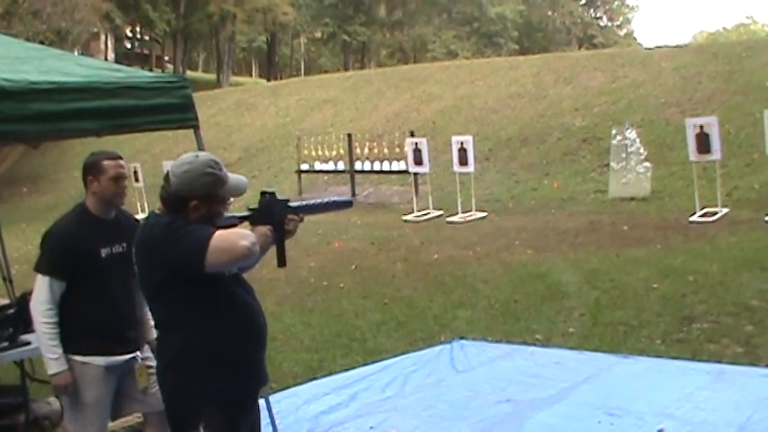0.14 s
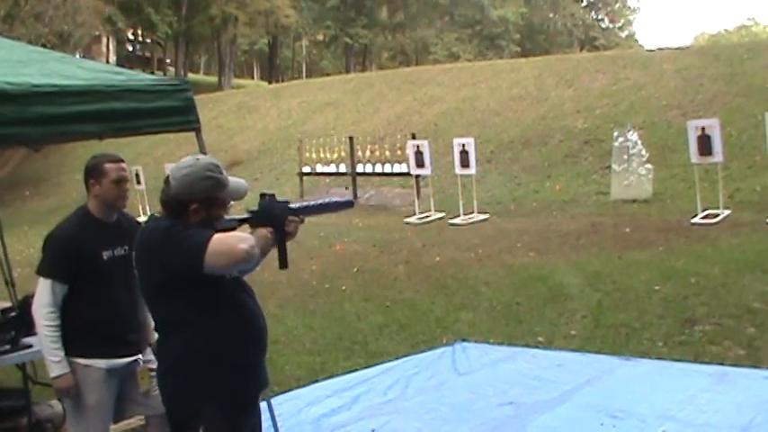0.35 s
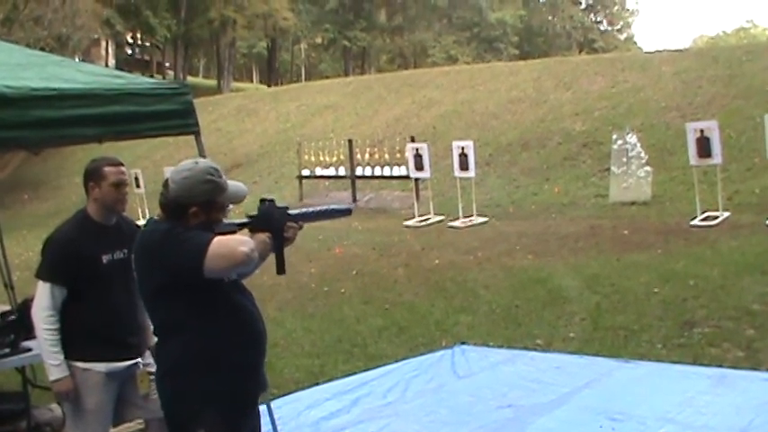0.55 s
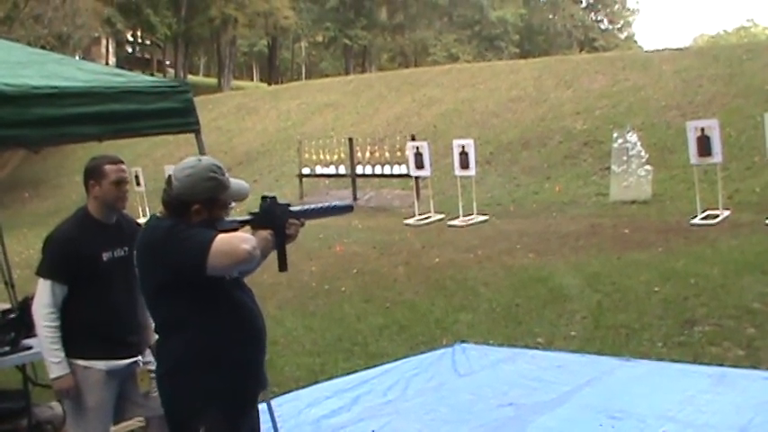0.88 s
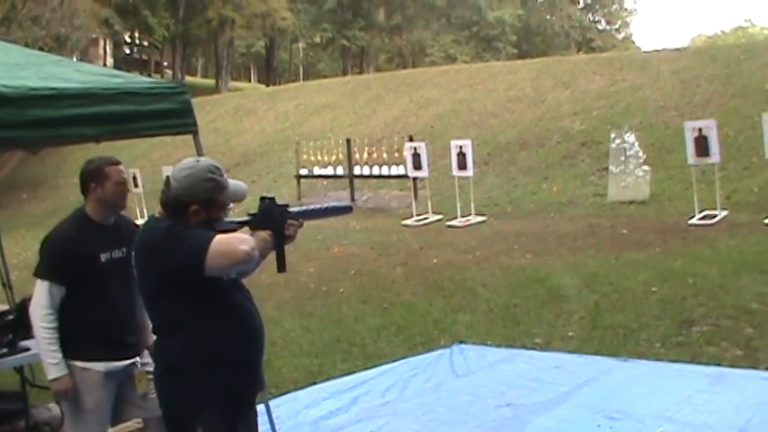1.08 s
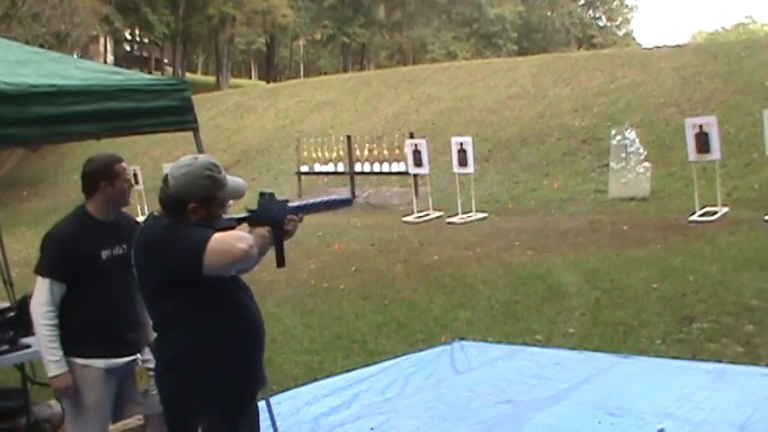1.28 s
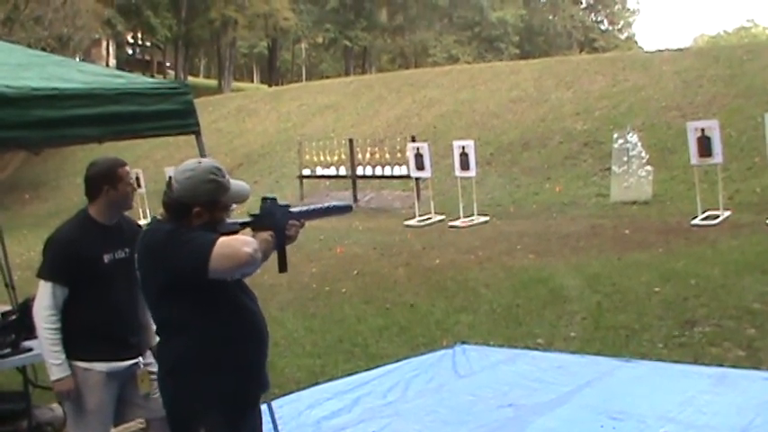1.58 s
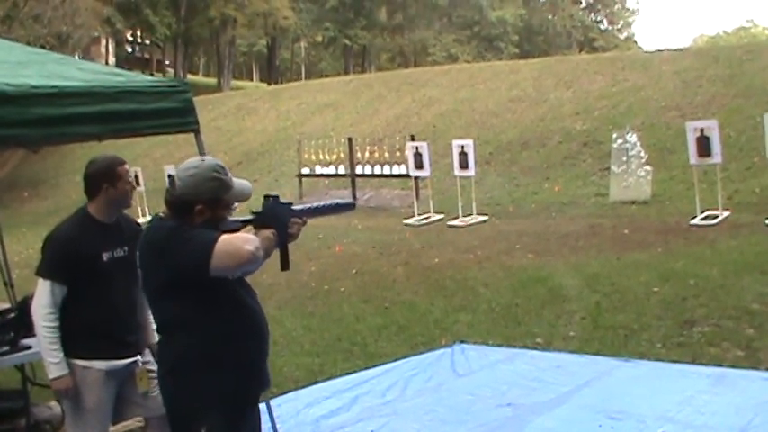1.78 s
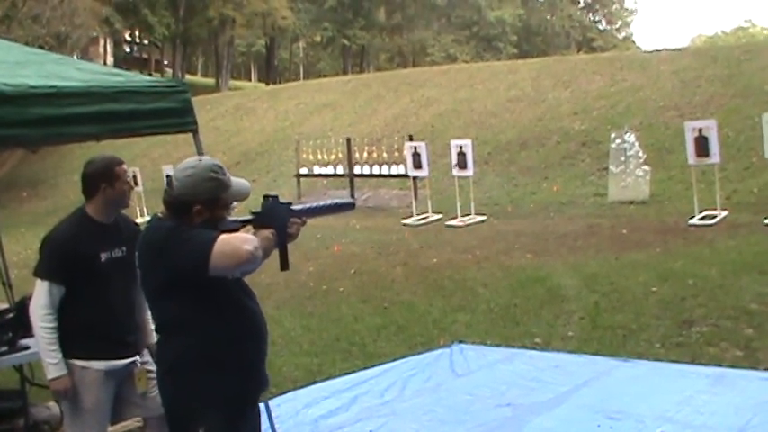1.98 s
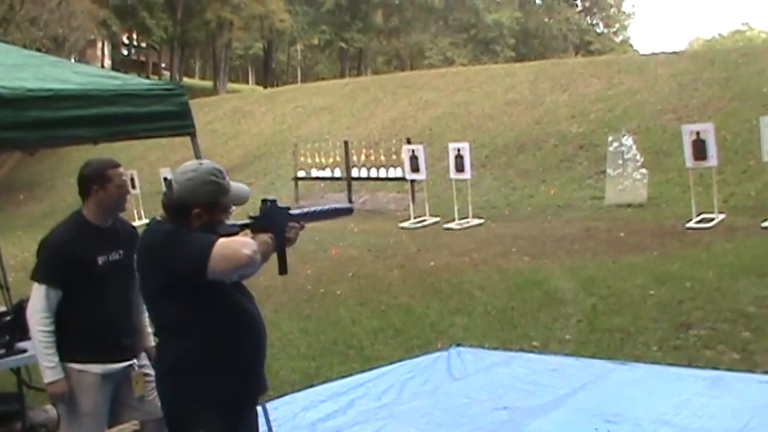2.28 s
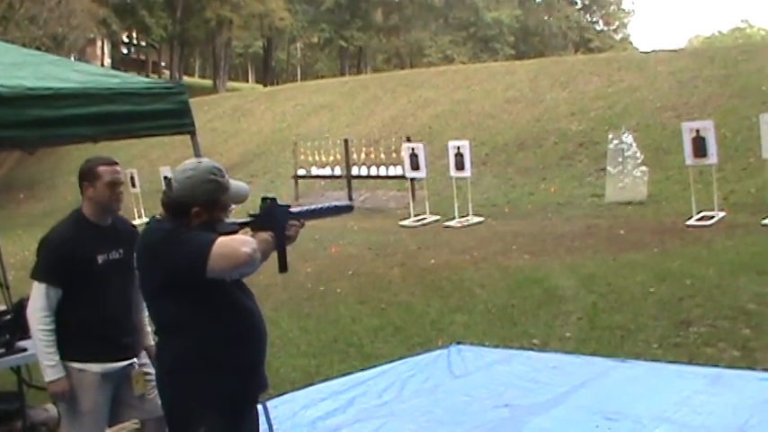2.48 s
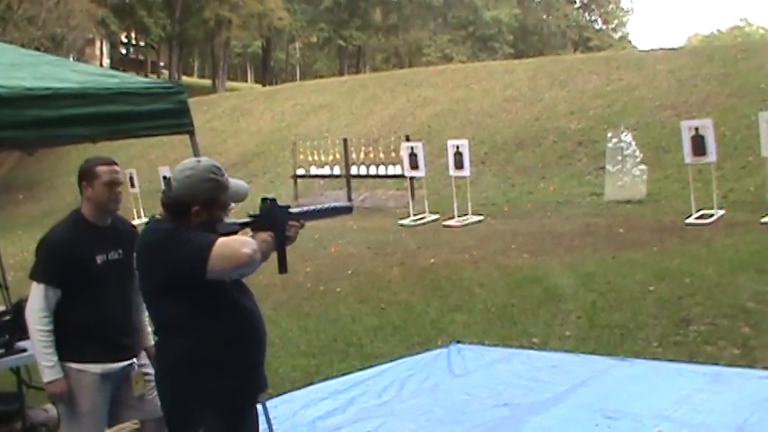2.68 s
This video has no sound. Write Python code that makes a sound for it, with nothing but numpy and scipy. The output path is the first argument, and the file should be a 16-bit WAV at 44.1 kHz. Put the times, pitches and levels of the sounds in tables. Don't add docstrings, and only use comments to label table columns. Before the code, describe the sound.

Close stereo pickup outdoors: rapid muffled gunshots in three bursts, each with a low pop and hard metallic clack, echoes returning from bank and trees, brass pattering on a sheet between; loudness squashed by a limiter.

```python
import sys
import numpy as np
from scipy import signal
from scipy.io import wavfile
from scipy.ndimage import uniform_filter1d, minimum_filter1d

SR = 44100
rng = np.random.default_rng(int(sys.argv[2]) if len(sys.argv) > 2 else 0)


def wrap_up_sound(samples):
    columns = np.atleast_2d(samples).T
    tamed = np.clip(columns, -1, 1)
    steps = np.round(tamed * 32767).astype(np.int16)
    wavfile.write(sys.argv[1], SR, steps)


def elevation(decibels):
    levels = np.asarray(decibels, float)
    return 10 ** (levels / 20)


N = 125685
STEP = 32
EDGES = 40 * 2 ** np.arange(0, 8.8, .25)
KNOCK_T = np.arange(4000) / SR
LEFT_RIGHT = np.array([[1], [-1]])


def at_hz(points, hz):
    known_hz, value = np.transpose(points)
    return np.interp(np.log(hz), np.log(known_hz), value)


def rms_one(x):
    return x / np.sqrt(np.mean(x ** 2) + 1e-20)


def drift(rate_hz):
    r = np.exp(-2 * np.pi * rate_hz * STEP / SR)
    noise = rng.standard_normal(N // STEP + 501)
    return rms_one(signal.lfilter([1], [1, -2 * r, r * r], noise)[500:])


def follow(curve, size):
    t = np.arange(N // size + 1) * size / SR
    return elevation(np.interp(t, *np.transpose(curve), left=-120, right=-120))


def swells(times, level_db, delay, rise, t60):
    t = np.arange(N // STEP + 1) * STEP / SR
    age = np.maximum(t - np.array(times)[:, None] - delay, 0)
    decay = elevation(np.array(level_db)[:, None] - 60 * age / t60)
    return np.sqrt(np.sum((decay * (1 - np.exp(-age / rise))) ** 2, axis=0))


def band_power(spectrum, envelope, patchy_db):
    hz, together = np.sqrt(EDGES[1:] * EDGES[:-1]), drift(24)
    colour = elevation(2 * at_hz(spectrum, hz))
    colour = colour / np.sum(colour * np.diff(EDGES) * 4 / SR)
    bands = []
    for c, f in zip(colour, hz):
        flicker = elevation(patchy_db * (0.87 * together + drift(19.0)))
        bands.append(c * (flicker * envelope(f)) ** 2)
    return np.array(bands)


# (frequency [Hz], likeness [0 to 1])
LIKENESS = [(60, 0.97), (180, 1), (550, 0.89), (1650, 0.84), (2800, 0.88), (4970, 0.8), (9000, 0.9),
            (14000, 0.46)]
# (frequency [Hz], level [dB])
LEAN = [(60, -1), (240, 0.5), (950, 1), (3770, 0.5), (9000, -1), (15000, 0)]


def banded(power):
    out = 0
    white = rng.standard_normal((2, 2, N + SR // 4))
    for k, (low, high) in enumerate(zip(EDGES, EDGES[1:])):
        band = signal.butter(3, [low, high], "band", fs=SR, output="sos")
        mid, side = signal.sosfilt(band, white[k % 2])[:, -N:]
        hz = np.sqrt(low * high)
        alike = np.clip(at_hz(LIKENESS, hz), 0, 1)
        pair = np.sqrt(1 + alike) * mid + np.sqrt(1 - alike) * side * LEFT_RIGHT
        gain = np.interp(np.arange(N) / STEP, np.arange(power.shape[1]), np.sqrt(power[k]))
        out = out + gain * pair * elevation(at_hz(LEAN, hz) / 2 * LEFT_RIGHT)
    return out


def add(out, s, sound, left_db):
    i = int(s * SR)
    if i >= 0:
        out[:, i:i + len(sound.T)] += (sound * elevation(LEFT_RIGHT / 2 * left_db))[:, :N - i]


# (frequency [Hz], level [dB per Hz])
AIR = [(18, -30), (40, -2), (150, -3.5), (300, 0.5), (440, -4.5), (800, 2), (3870, -8.5), (9000, -17),
       (16000, -44)]


def air():
    return band_power(AIR, lambda hz: elevation(-48.5), 0.94)


# (time [s], level [dB])
CRINKLE = [(1.8385, -60), (1.843, -17.5), (1.856, -20.5), (1.882, -22), (1.895, -40), (1.912, -33),
           (1.925, -35), (1.95, -32), (1.98, -34), (2.07, -43)]
# (frequency [Hz], level [dB per Hz])
TARP = [(180, -38), (300, -10), (1060, -11), (2300, -8.5), (3300, -6), (6300, -5), (10500, -16),
        (16000, -22)]


def tarp():
    shape = follow(CRINKLE, size=STEP)
    return band_power(TARP, lambda hz: shape, 1.8)


# (time [s], level [dB])
SLIDE = [(1.8385, -57), (1.844, -20), (1.85, -16.5), (1.858, -22), (1.88, -19), (1.912, -16.5),
         (1.917, -29), (1.95, -24.5), (1.98, -32), (2.025, -36.5), (2.07, -53)]
# (frequency [Hz], width [Hz], level [dB])
BRASS = [(6500, 540, 6), (10500, 690, -7.5), (8140, 4600, 5.5), (13000, 2500, -25), (4000, 1100, -10)]


def brass():
    clicks_per_s, side_db, left_db = 11000, -13, -4
    struck = rng.random((2, N)) < clicks_per_s / SR
    clicks = struck * rng.standard_normal((2, N)) + 1e-18
    ring = 0
    for hz, width, db in BRASS:
        mode = signal.iirpeak(hz, hz / width, fs=SR)
        ring = ring + elevation(db) * rms_one(signal.lfilter(*mode, clicks))
    mid, side = ring
    pair = mid + elevation(side_db) * side * LEFT_RIGHT
    return follow(SLIDE, size=1)[:N] * pair * elevation(LEFT_RIGHT / 2 * left_db - 10.5)


# (time [s], peak level [dB], centre [Hz], t60 [s])
TICKS = [(0.136, -16, 9000, 0.015), (.138, -19, 2470, 0.0067), (.158, -9.5, 4760, 0.048),
         (.313, -5, 7000, 0.029), (.397, -14, 4000, .015), (1.317, -12, 3030, .012),
         (1.3258, -4, 3800, 0.0065), (.145, -11, 4500, 0.083), (1.132, -16, 8800, 0.014),
         (1.134, -23, 15000, 0.027), (1.1675, -5, 4170, 0.022), (2.0292, -13, 9000, .03),
         (2.036, -10, 4570, 0.12), (2.042, -16, 9000, .04), (2.065, -2.5, 4000, 0.045),
         (.161, -10, 8000, .012), (0.171, -14, 4500, 0.0047), (.2415, -10, 7500, 0.0089),
         (.3105, -17, 5000, .006), (.9268, -44, 12500, .02), (1.0011, -57, 12000, .015),
         (1.0201, -56, 12500, .015), (2.143, -6, 1380, 0.01), (1.2932, -8.5, 2270, 0.013),
         (1.162, -2, 4000, 0.01), (1.1499, 0, 7500, .012), (1.154, -5, 6900, .015),
         (1.832, -32, 12000, 0.016), (1.8395, -19, 11000, .006), (1.8385, -32, 5000, .006),
         (1.877, -17, 10500, .02), (1.171, -10, 2180, .012), (1.8408, -22, 2900, 0.0062),
         (1.842, -4.5, 7200, 0.035), (1.8479, -18, 6500, 0.024), (1.844, -11, 2640, 0.056),
         (1.861, -12.5, 2000, 0.027), (1.876, -15, 3000, 0.012), (1.9201, -15, 2460, 0.0072),
         (1.9193, -13, 4600, 0.0083), (1.918, -10, 8000, 0.016), (1.919, -16, 13000, 0.011),
         (2.0525, -18, 4500, .006), (2.059, -12, 3500, 0.0051), (2.5, -34, 12500, .012),
         (2.52, -32, 11500, .02)]


def ticks():
    out, t = np.zeros((2, N)), KNOCK_T
    for s, db, hz, t60 in TICKS:
        noise = rng.standard_normal(len(t))
        band = signal.butter(2, [hz * 0.66, min(hz * 1.22, .45 * SR)], "band", fs=SR, output="sos")
        burst = signal.sosfilt(band, noise * elevation(-60 * t / t60))
        add(out, s, elevation(db) * burst / np.abs(burst).max(), 0)
    return out


# (time [s], peak level [dB], pitch [Hz], t60 [s], side angle [rad]: 0 centre, 1.5 opposite in the two sides)
THUDS = [(0.177, -9, 236, 0.039, .05), (.181, -26.5, 356, 0.021, -0.25), (0.237, -11, 278, 0.011, 1.3),
         (0.253, -18, 330, 0.04, -0.32), (.310, -17, 312, 0.011, 0.75), (0.341, -18, 258, 0.023, -0.4),
         (0.403, -21.5, 400, 0.036, -0.23), (1.148, -20, 300, 0.022, 1), (1.174, -17.5, 330, 0.038, -.2),
         (1.216, -15, 272, 0.012, -0.68), (1.248, -15, 300, 0.018, -.2), (1.321, -15.5, 356, 0.045, -0.2),
         (1.401, -20.5, 183, 0.032, -0.14), (1.84, -25.5, 266, 0.024, -0.06), (1.875, -38, 276, .03, 0),
         (1.949, -21, 253, 0.022, -0.049), (2.069, -22, 330, 0.02, -0.39),
         (2.145, -19.5, 247, 0.023, 0.067), (2.219, -14, 240, 0.015, 0), (1.861, -34.5, 120, 0.045, 0),
         (1.9495, -31, 700, 0.014, 0), (2.142, -18, 383, 0.031, -0.31), (2.212, -20, 367, 0.04, -0.2),
         (2.282, -19, 376, 0.03, -0.24), (2.521, -36, 252, 0.035, 0)]


def thuds():
    out, t, rise_cycles = np.zeros((2, N)), KNOCK_T, 0.54
    for s, db, hz, t60, side in THUDS:
        shape = elevation(-60 * t / t60) * (1 - np.exp(-t * hz / rise_cycles)) ** 2
        tone = np.sin(2 * np.pi * hz * t) + 0.43 * np.sin(2 * np.pi * 1.534 * hz * t)
        placed = tone * (np.cos(side) + np.sin(side) * LEFT_RIGHT)
        add(out, s, elevation(db - 2.0) * shape / shape.max() * placed, 0)
    return out


# (time [s], peak level [dB])
SLAMS = [
    (0.239, -7),
    (0.3124, -1.5),
    (1.1466, 2),
    (1.2183, 3),
    (1.2909, -4),
    (1.3945, -8),
    (1.9187, -6.5),
    (2.06, 1),
    (2.1398, -5),
]


def slams():
    out, length_s = np.zeros((2, N)), .00022
    ramp = 2 * KNOCK_T / length_s - 1
    for s, db in SLAMS:
        add(out, s, elevation(db) * (ramp + 0.35) * (ramp <= 1), 0)
    return out


# (time [s], pop level [dB], crack level [dB], action level [dB])
ROUNDS = [(-.33, -12, -24.5, -20), (0.1359, -7, -11, -21), (0.212, -9.5, -14, -20),
          (0.2859, -9.5, -13, -22), (.3595, -9.5, -15, -26.5), (1.1327, -10, -10.5, -18.5),
          (1.2061, -13.5, -17.5, -22), (1.2796, -14, -14.5, -25), (2.0280, -5.5, -9, -20.5),
          (2.1006, -7.5, -15, -37), (2.1704, -8.5, -14.5, -19), (2.2413, -9, -14, -23)]
# (frequency [Hz], level [dB per Hz])
ACTION = [(290, -40), (500, -19), (750, 4.5), (1640, -8), (1930, 0), (6610, -7.5), (8960, 3.5),
          (16000, -14)]


def action():
    s, _, _, db = np.transpose(ROUNDS)
    shape = swells(s, db, delay=0, rise=0.0022, t60=0.64)
    return band_power(ACTION, lambda hz: shape, 2.5)


# (frequency [Hz], level [dB per Hz])
ECHO = [(35, -41), (60, -15), (300, -16), (500, -16.5), (1000, -15.5), (2000, -6.5), (4400, -1), (8700, -4),
        (16000, -18)]
# (frequency [Hz], t60 [s])
ECHO_T60 = [(100, 0.89), (400, 1.72), (1000, 1.93), (3000, 1.686), (4500, 1.21), (6500, 0.97),
            (10000, 0.75), (12500, 0.56), (15500, 0.45)]


def echoes():
    s, _, db, _ = np.transpose(ROUNDS)

    def tail(hz):
        return swells(s, db, delay=0.02, rise=0.016, t60=at_hz(ECHO_T60, hz))

    return band_power(ECHO, tail, 0.75)


# (frequency [Hz], level [dB], t60 [s])
POP = [(79, -4.5, 0.03), (122, -2, 0.046), (330, -10, 0.028), (424, -14.5, 0.024), (616, -11.5, 0.033),
       (745, -10, 0.024), (980, -15, 0.019), (1142, -14, 0.032), (1470, -9, 0.016)]


def pops():
    out, t = np.zeros((2, N)), KNOCK_T
    rise_s, spread_db, glide_per_s, left_db = .0011, 1.2, 16.6, 1
    lead_rad = 0.14 * LEFT_RIGHT
    for s, db, _, _ in ROUNDS:
        rings = 0
        for hz, mode_db, t60 in POP:
            luck = rng.normal()
            cycles = hz * t * (1 + glide_per_s * t) if hz < 200 else hz * t + luck
            decay = elevation(db + mode_db + spread_db * luck - 60 * t / t60)
            rings = rings + decay * np.sin(2 * np.pi * cycles + 0.52 + lead_rad)
        add(out, s, rings * (1 - np.exp(-t / rise_s)), left_db)
    return out


def scene():
    hiss = banded(air() + tarp() + action() + echoes())
    return hiss + brass() + ticks() + thuds() + slams() + pops()


def low_pass(x):
    return signal.sosfilt(signal.butter(12, 17020, fs=SR, output="sos"), x)


def record(dry):
    limit_db, share, attack_s, release_db_per_s = -18, 0.8, 0.0022, 110
    low_cut_hz, top_cut_hz, look_ahead_s = 74, 16050, .003
    r = np.exp(-1 / (attack_s * SR))
    power = signal.lfilter([1 - r], [1, -r], np.mean(dry ** 2, axis=0))
    over = np.maximum(10 * np.log10(power + 1e-12) - limit_db, 0)
    ramp = release_db_per_s * np.arange(N) / SR
    held = np.maximum.accumulate(over + ramp) - ramp
    x = signal.sosfilt(signal.butter(2, low_cut_hz, "high", fs=SR, output="sos"), dry)
    x = x * elevation(-share * signal.lfilter([1 - r], [1, -r], held))
    ahead = 2 * int(look_ahead_s * SR) + 1
    room = np.minimum(1, 1 / (np.abs(x).max(axis=0) + 1e-9))
    duck = minimum_filter1d(room, ahead, origin=-(ahead // 4))
    x = x * uniform_filter1d(duck, ahead // 2)
    rounded = 1.3 * np.tanh(x)
    mix = signal.sosfilt(signal.cheby2(16, 50, top_cut_hz, fs=SR, output="sos"), rounded)
    return low_pass(mix)


dry = scene()
out = record(dry)
wrap_up_sound(out)
```